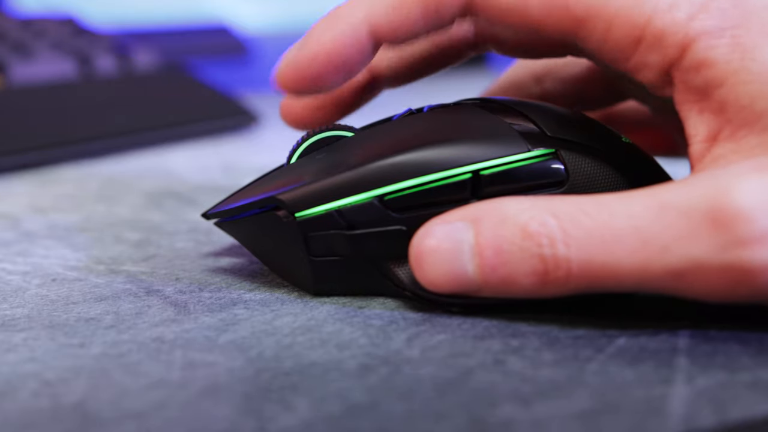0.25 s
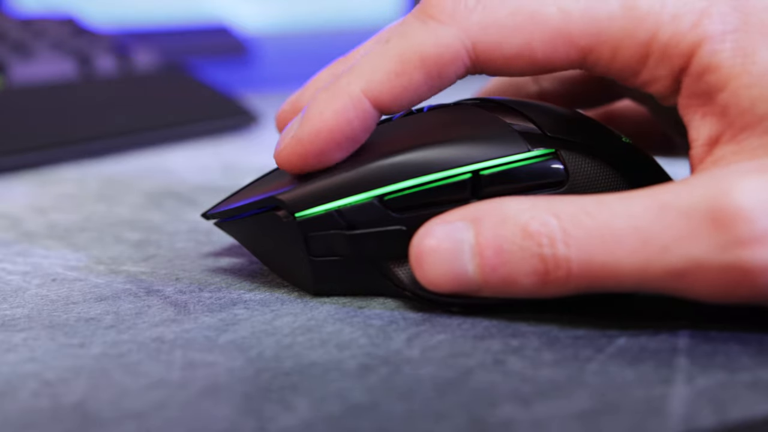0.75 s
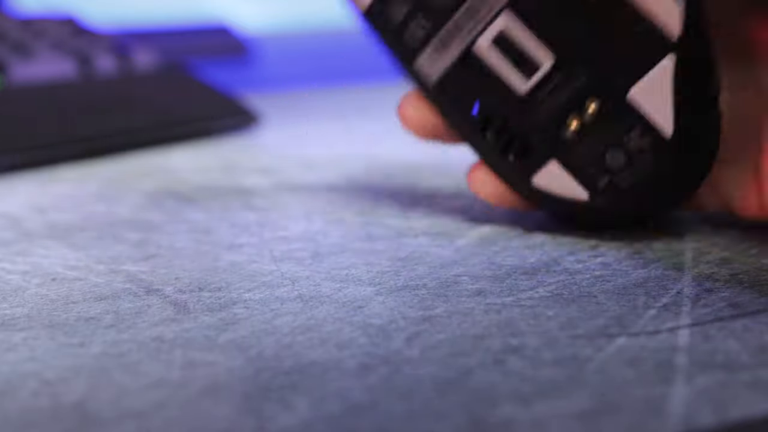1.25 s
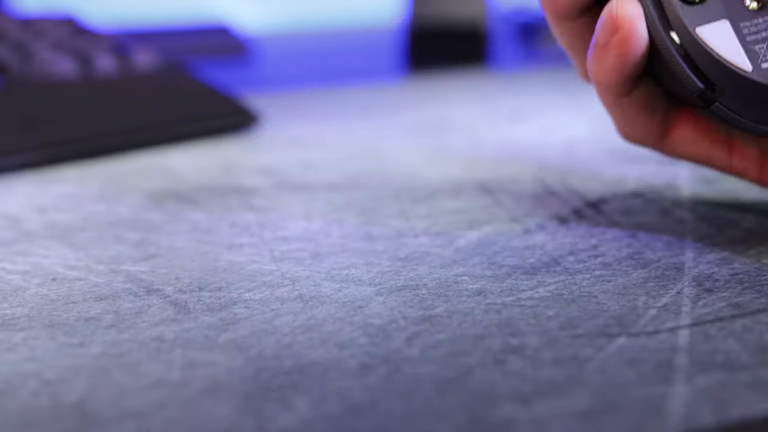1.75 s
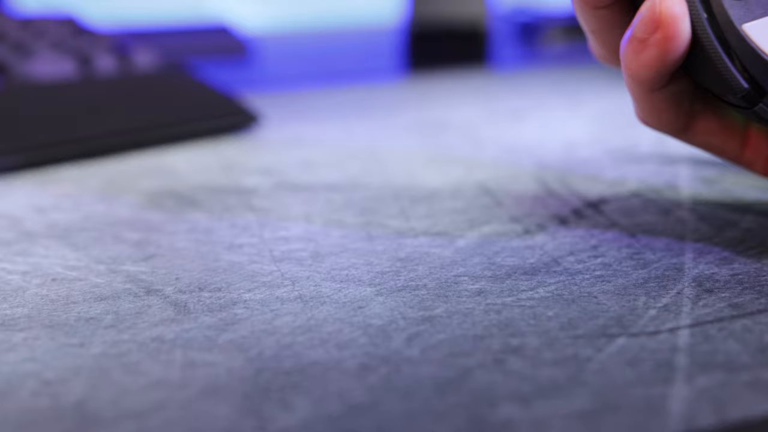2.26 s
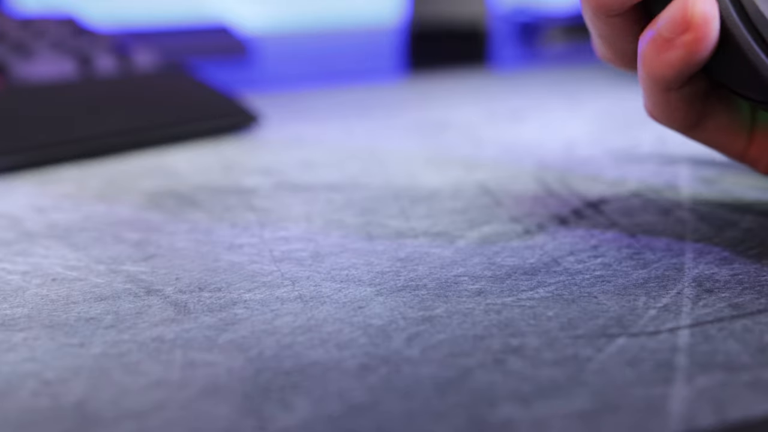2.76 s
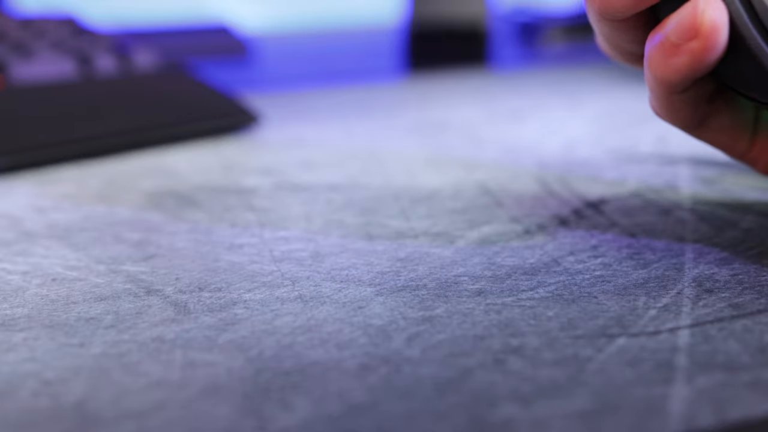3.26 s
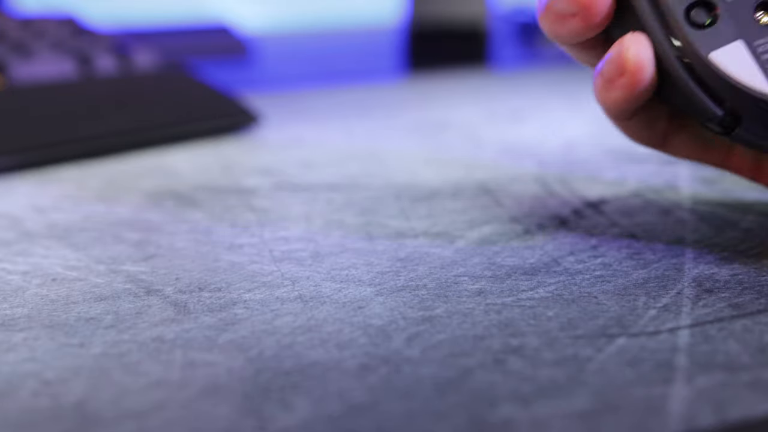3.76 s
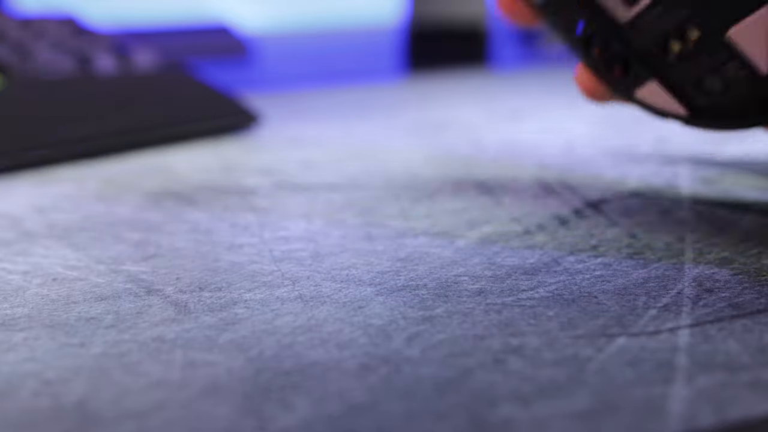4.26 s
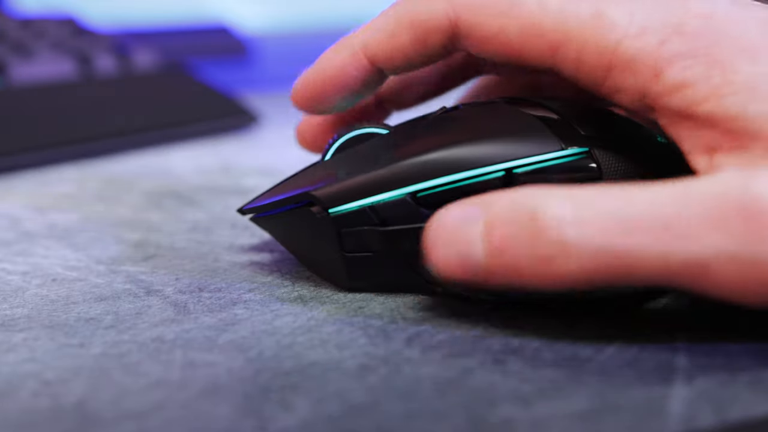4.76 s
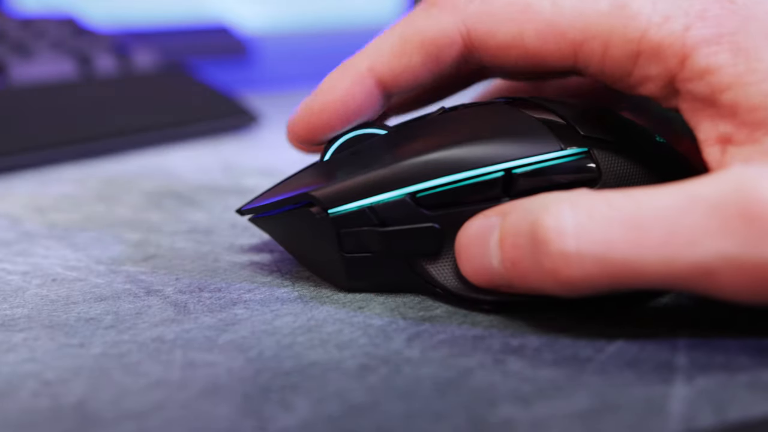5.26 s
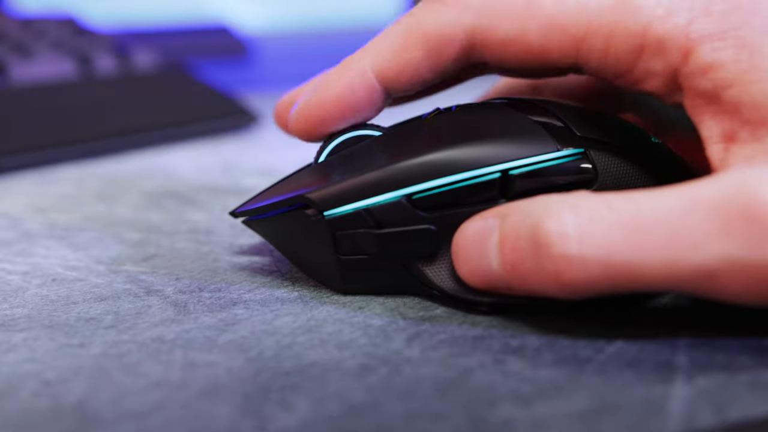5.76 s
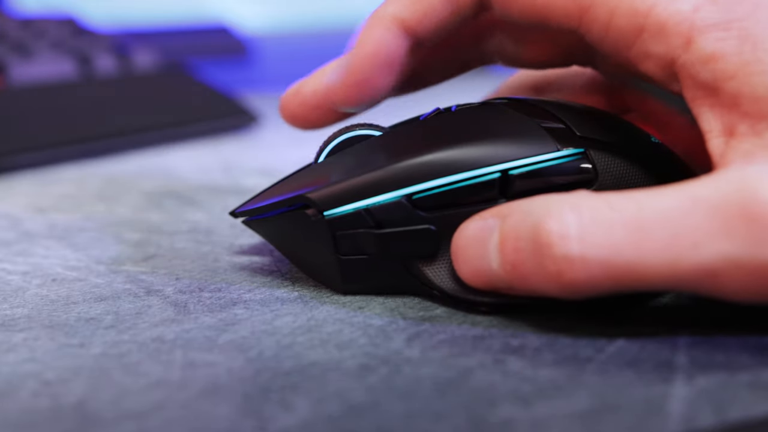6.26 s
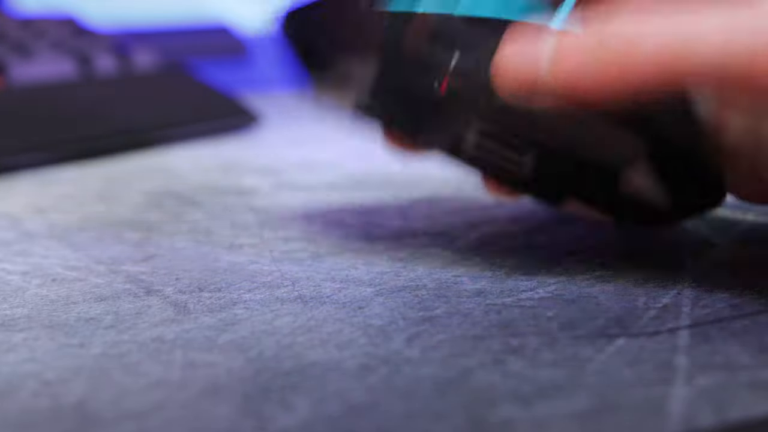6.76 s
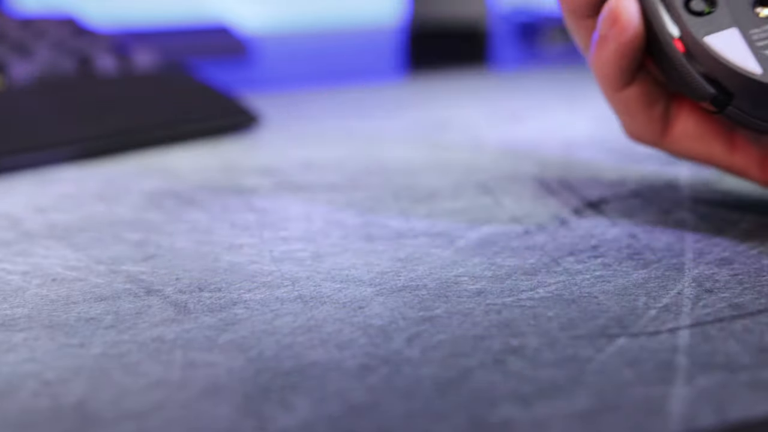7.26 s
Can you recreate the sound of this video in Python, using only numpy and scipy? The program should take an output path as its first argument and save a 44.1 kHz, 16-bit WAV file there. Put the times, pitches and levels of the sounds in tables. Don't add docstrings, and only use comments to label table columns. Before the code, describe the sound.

In a quiet small room with low fan hum, a mouse double-clicks, is lifted, ticked and clicked in hand, then set down with a knock.

```python
import sys
import numpy as np
from scipy import signal
from scipy.fft import rfft, irfft, next_fast_len
from scipy.io import wavfile
from scipy.ndimage import uniform_filter1d

SR = 44100
rng = np.random.default_rng(int(sys.argv[2]) if len(sys.argv) > 2 else 0)


def boost(x):
    u = np.asarray(x, float) / 20
    return 10 ** u


def inscribe(sig):
    pcm = np.round(np.clip(np.atleast_2d(sig).T, -1, 1) * 32767)
    wavfile.write(sys.argv[1], SR, pcm.astype(np.int16))


N = 331191


def evened(x):
    return x / np.sqrt(np.mean(x ** 2) + 1e-20)


def read(points, hz):
    f, value = np.transpose(points)
    return np.interp(np.log(hz + 1), np.log(f + 1), value)


def add(mix, s, sound):
    part = mix[round(s * SR):][:len(sound)]
    part += sound[:len(part)]


def filtered(x, hz, kind="low"):
    return signal.sosfilt(signal.butter(N=2, Wn=hz, btype=kind, fs=SR, output="sos"), x)


def coloured(points):
    size = next_fast_len(N)
    shape = boost(read(points, np.fft.rfftfreq(size, 1 / SR)))
    return evened(irfft(rfft(rng.standard_normal(size)) * shape, size)[:N])


def narrow(hz, width):
    slow = rng.standard_normal(N) + 1j * rng.standard_normal(N)
    r = np.exp(-np.pi * width / SR)
    slow = signal.lfilter([1], [1, -2 * r, r * r], slow)
    carrier = np.exp(2j * np.pi * hz * np.arange(N) / SR)
    return evened((slow * carrier).real)


def patchy(x, depth_db):
    z = signal.stft(x, nperseg=256)[2]
    across_hz = uniform_filter1d(rng.standard_normal(z.shape), 9, 0)
    patches = evened(uniform_filter1d(across_hz, 12, 1))
    return signal.istft(z * boost(depth_db * patches), nperseg=256)[1][:N]


def ring(modes, colour, factor, rise_ms, crack_db, size=4096):
    hz, db, t60_ms = np.transpose(modes)[:, :, None]
    t = np.arange(size) / SR
    scatter_db = 1.0 * rng.standard_normal(hz.shape)
    phase = .04 * rng.standard_normal(hz.shape)
    level = boost(db + read(colour, hz) + scatter_db - 64000.0 * t / t60_ms)
    body = (level * np.sin(2 * np.pi * (hz * factor * t + phase))).sum(0)
    bins = np.fft.rfftfreq(size, 1 / SR)
    shape = boost(read(np.c_[hz, np.minimum(db, -9)], bins) + read(colour, bins)) * (bins > hz[0] / 2)
    crack = irfft(rfft(rng.standard_normal(size)) * shape, size)
    body = body + boost(crack_db - 60 * t / 0.0093) * crack
    return body * (1 - np.exp(-(1e3 * t / rise_ms) ** 2))


def hits(table, modes, tone, rise_ms, crack_db):
    out = np.zeros(N)
    for s, db, contact_db, factor in table:
        colour = [(hz, base_db + slope * contact_db) for hz, base_db, slope in tone]
        colour = sorted(colour + [(3500, 0)])
        add(out, s - rise_ms / 2e3, boost(db) * ring(modes, colour, factor, rise_ms, crack_db))
    return out


# (frequency [Hz], density [dB/Hz])
AIR_SPECTRUM = [(12, -49), (20, -14.5), (53, -9), (71, -9), (117, -4.5), (147, -12), (237, -3), (273, -9),
                (440, -12), (1180, -16.5), (2580, -28), (3830, -36), (4790, -43.5), (15200, -48.5),
                (16500, -67)]
# (frequency [Hz], width [Hz], level [dB])
BACKGROUND_TONES = [(84.5, 6.4, -57), (120, 7.8, -61.5), (233.5, 26, -63), (1176, 92, -66), (3755, 930, -74)]


def room_tone():
    hum = boost(-53.5) * np.sin(2 * np.pi * 120.5 * np.arange(N) / SR)
    fan = sum(boost(db) * narrow(hz, width) for hz, width, db in BACKGROUND_TONES)
    return boost(-51) * coloured(AIR_SPECTRUM) + fan + hum


# (frequency [Hz], T60 [s], level [dB])
ROOM_DECAY = [(200, 0.12, 8.5), (1090, 0.37, -9.5), (2500, 0.34, -5.5), (3800, 0.35, -2.5),
              (5500, 0.3, -3.5), (9000, 0.35, -10.5), (15000, 0.19, -12.5)]


def room(x, scatter_hz):
    size = SR // 2
    hz = signal.stft(np.zeros(size), SR, nperseg=256)[0]
    t60, level_db = (read(np.array(ROOM_DECAY)[:, [0, k]], hz)[:, None] for k in (1, 2))
    turn = np.cumsum(rng.standard_normal(N)) * np.sqrt(2 * np.pi * scatter_hz / SR)
    out = np.zeros(N)
    at = np.arange(300, size - 10, 10)
    for share in (np.cos(turn), np.sin(turn)):
        taps = np.zeros(size)
        taps[at + rng.integers(0, 10, at.shape)] = rng.choice([-1., 1.], at.shape)
        _, t, z = signal.stft(taps, SR, nperseg=256)
        z = z * boost(level_db - 60 * t / t60) / np.sqrt(t60)
        tail = signal.istft(z, SR, nperseg=256)[1]
        out += signal.fftconvolve(x * share, tail / np.linalg.norm(tail))[:N]
    return out


# (start [s], length [s], hiss [dB], speed as brightness [dB])
SKIN_STROKES = [(0.955, 0.17, -74.5, -5), (1.09, 0.16, -69.5, -7), (1.2, 0.24, -64, 3),
                (1.38, 0.17, -57.5, 6), (1.535, 0.084, -56.5, 5.5), (1.81, 0.082, -70, 1.5),
                (2.13, 0.16, -69, 0), (2.25, 0.22, -71.5, -8), (2.479, 0.058, -60.5, -3),
                (2.603, 0.099, -62.5, 2), (2.95, .1, -70, -4), (3.185, 0.041, -66, 5),
                (3.304, 0.029, -65, -2), (3.46, .14, -71, -8), (3.925, 0.04, -63, -9),
                (3.951, 0.096, -56.5, 8.5), (4.036, 0.081, -61.5, 8), (4.105, .077, -58.5, 7),
                (6.572, 0.28, -71, -9), (6.773, 0.25, -62, 1), (6.975, .075, -59, 4), (7.02, 0.11, -55, 9),
                (7.15, 0.13, -61.5, 5), (7.272, 0.059, -67, 8), (7.322, 0.051, -59, 4),
                (7.37, 0.056, -67.5, 0.5), (7.42, .13, -65, 3)]
# (start
# [s], length [s], hiss [dB], speed as brightness [dB])
FOOT_STROKES = [(.39, .06, -75, -1), (0.452, 0.054, -68.5, 4), (1.19, 0.14, -67.5, -6.5),
                (4.17, 0.072, -78, 2), (4.34, 0.027, -72.5, -10), (4.448, .066, -60, -7),
                (4.51, 0.064, -65.5, -8), (4.617, .1, -61.5, 7), (4.655, 0.083, -59.5, -12),
                (4.776, .091, -70, 3), (5.24, 0.12, -79.5, -9), (5.798, .12, -76, -1.5)]
# (frequency [Hz], density [dB/Hz])
HISS_SPECTRUM = [(1200, -10), (2000, 10), (4500, 1), (7300, 5.5), (9000, 1), (12500, -1), (15500, -6)]
# (frequency [Hz], width [Hz])
RUBBED_RESONANCES = [(1170, 710), (3750, 1160)]
# (level re hiss [dB], slope with brightness [dB/dB])
SKIN_WAKE = [(1, -0.98), (1.5, -0.42)]
FOOT_WAKE = [(7.8, -0.73), (2.5, -.6)]


def rubbing():
    out = np.zeros(N)
    grain = boost(.7 * evened(uniform_filter1d(rng.standard_normal(N), 120)))
    hiss = coloured(HISS_SPECTRUM)
    bright = filtered(hiss, 9500, "high")
    bands = [narrow(*band) for band in RUBBED_RESONANCES]
    for strokes, wake in ((SKIN_STROKES, SKIN_WAKE), (FOOT_STROKES, FOOT_WAKE)):
        for start, length, hiss_db, bright_db in strokes:
            span = slice(round(start * SR), min(round((start + length) * SR), N))
            sound = hiss[span] + (boost(bright_db) - 1) * bright[span]
            for (db, slope), band in zip(wake, bands):
                sound = sound + boost(db + slope * bright_db) * band[span]
            t = np.arange(len(sound)) / SR
            press = np.sin(np.pi * np.clip((t + 0.0016) / (length + 0.0044), 0, 1)) ** 1.06
            out[span] += boost(hiss_db) * press * sound
    return patchy(out * grain, 1.8)


# (time [s], blow [dB], contact force [dB], push into the desk [dB])
LANDINGS = [(4.4542, -30, 2, -16.5), (4.459, -13, -3, -39), (4.4622, -22.5, 9.5, -45),
            (4.4629, -21, 0, -49), (4.468, -29, -5, -39), (4.476, -37, -7, -43), (4.4915, -35, -7, -28.5),
            (4.527, -50, 0, -36), (4.6727, -32, -4, -21.5), (4.6765, -21.5, 3.5, -38),
            (4.684, -32, 10, -51), (4.690, -32, -6, -27.5), (4.815, -54, 1.5, -38.5)]
# (frequency [Hz], level [dB], T60 [ms])
DESK_MODES = [(88, -14, 210), (111.5, -5, 200), (144.4, -1.5, 110), (172, -2.5, 90), (209, -5, 90),
              (347, 1.5, 50.5), (543, -14, 86)]


def desk():
    out = np.zeros(N)
    for s, *_, push_db in LANDINGS:
        thud = ring(DESK_MODES, [(1, 0), (2, 0)], 0.918, 2.1, -18.5, size=12000)
        add(out, s + 0.00086, boost(push_db) * thud)
    return out


# (frequency [Hz], level [dB], T60 [ms])
BASE_MODES = [(680, -11.5, 30), (971, -1, 55), (1085, -5.5, 51), (1286, -8, 49), (1460, -10, 9),
              (1820, -2, 21), (2180, 1, 18.3), (2990, -9.5, 11), (3107, -1, 29.4), (3500, -2, 19.4),
              (3770, -10, 33), (4210, -9.5, 22), (5200, -9, 20), (6540, -8, 12), (7730, -15, 43),
              (10800, -11.5, 17), (12900, -14.5, 6), (13100, -7, 6), (15200, -11, 6)]
# (frequency [Hz], level [dB], slope with force [dB/dB])
FOOT_TONE = [(1000, 0, 0.098), (6000, -2.2, .4), (12000, -5, 0.82)]


def landings():
    feet = [(*row[:3], 1) for row in LANDINGS]
    return hits(feet, BASE_MODES, FOOT_TONE, 0.53, 14.5)


# (frequency [Hz], level [dB], T60 [ms])
SHELL_MODES = [(972, -7.5, 67), (1014, -10, 37), (2055, -8, 24), (2640, 2, 11), (3400, -6, 24),
               (3810, -8.5, 30), (4500, -4, 17), (6180, -13, 7.2), (7860, -11, 7.4), (10600, -19, 6.5),
               (13800, -21, 6)]
# (time [s], blow [dB], contact force [dB], pitch factor [1])
CREAKS = [(1.571, -41, 1.5, 0.95), (2.4535, -49, 2.5, 1.001), (2.475, -48, 0, 0.77),
          (2.499, -39.5, -14, 0.84), (2.631, -47, -6, 1.001), (3.950, -36, -6, 1.1),
          (4.3465, -44.5, 0, 0.92), (4.812, -40, -22, 1.001), (6.72, -50, 3, 1.2), (6.838, -46.5, 5, 1.001),
          (7.255, -50, 7, 0.9)]
# (frequency [Hz], level [dB], slope with force [dB/dB])
CREAK_TONE = [(1000, -15.5, -.1), (6000, -9, 1.1), (12000, -4, .6)]


def creaks():
    return hits(CREAKS, SHELL_MODES, CREAK_TONE, 0.38, 13.0)


# (time [s], blow [dB], contact force [dB], pitch factor [1])
KNOCKS = [
    (2.8525, -33, 3, 1.02),
    (3.335, -36.5, 0, 1),
    (3.4243, -39.5, -10, 1),
    (3.6223, -30.5, 2, 0.99),
    (7.313, -37, -17, 0.9),
    (7.451, -39, -3, 1.15),
    (7.455, -35, 5, 1.05),
]
# (frequency [Hz], level [dB], slope with force [dB/dB])
KNOCK_TONE = [(1000, 1.2, 0.21), (5850, .1, 1.9), (12000, 1.2, .3)]


def knocks():
    return hits(KNOCKS, SHELL_MODES, KNOCK_TONE, 0.53, 9.6)


# (frequency [Hz], level [dB], T60 [ms])
PLATE_MODES = [(1084, -14, 38), (1140, 0, 26.5), (1720, -16, 20), (2344, -7.5, 37), (3630, -6, 14),
               (4430, -14.5, 10), (6000, -24, 8), (12000, -38, 5)]
# (time [s], blow [dB], contact force [dB], pitch factor [1])
TAPS = [
    (3.986, -34, -4.5, 0.99),
    (4.154, -23.5, -2, 0.97),
    (4.319, -48.5, 7, 1.02),
    (7.009, -38, 3, 0.95),
    (7.0215, -28.5, 2, 1.035),
    (7.025, -37, 3, 0.97),
    (7.035, -50, -2, 1.1),
]
# (frequency [Hz], level [dB], slope with force [dB/dB])
TAP_TONE = [(1000, 0.3, 1.3), (2400, -4.5, -1.5), (6000, 2, .4), (12000, -.8, .4)]


def taps_on_base():
    return hits(TAPS, PLATE_MODES, TAP_TONE, 0.83, 3)


# (frequency [Hz], level [dB], T60 [ms])
WIRE_MODES = [(7260, 1.5, 47), (7280, -13, 60)]
# (time [s], blow [dB], contact force [dB], pitch factor [1])
WIRE_PINGS = [
    (1.589, -43, 0, 1.01),
    (3.745, -54, 0, 0.94),
]


def wire():
    return hits(WIRE_PINGS, WIRE_MODES, [(1000, 0, 0)], 0.38, -30)


# (frequency [Hz], level [dB], T60 [ms])
BUTTON_MODES = [(1020, -19, 48), (3330, -12.5, 8.3), (4410, -13, 5), (6770, -14, 7), (7370, -15, 13),
                (9110, -9.5, 3.9), (12080, -16, 16), (13000, 3, 5), (14500, 3, 6), (15250, -3, 8)]
# (time [s], blow [dB], contact force [dB], pitch factor [1])
TICKS = [
    (1.5886, -25, -6, 1.02),
    (1.7106, -24.5, 4.5, 0.99),
    (3.745, -22.5, -6, 1.01),
    (3.9965, -21.5, 0, 1.05),
]
# (frequency [Hz], level [dB], slope with force [dB/dB])
TICK_TONE = [(1000, -5, -0.53), (6000, 0, 0.74), (12000, 6, .01), (13200, -2, -1.1), (14500, .8, 0.12)]


def ticks():
    return hits(TICKS, BUTTON_MODES, TICK_TONE, 0.42, 8.2)


# (frequency [Hz], level [dB], T60 [ms])
SPRING_MODES = [(1290, -19.5, 19), (1890, -12.5, 11.8), (2640, -11, 7.3), (3384, 1, 17), (3510, -8, 13.7),
                (4300, -4.5, 3.8), (5610, -15, 10.3), (6040, -10, 3.8), (6740, -7, 4.7), (8020, -20.5, 6.4),
                (10740, -15, 10), (13800, -20, 5)]
# (time [s], blow [dB], contact force [dB], pitch factor [1])
CLICKS = [
    (.5337, -23.5, 16, 1.025),
    (0.5632, -19.5, 5, 1.027),
    (.6879, -22, 16, 1.05),
    (0.7402, -19.5, 3, 1.024),
    (2.772, -19.5, 8.5, 1.03),
    (3.178, -18.5, -1, 1.003),
    (3.3552, -20.5, 10.5, 1.012),
    (3.6623, -19.5, -1, 1.018),
    (7.5003, -23.5, 10, 1.08),
]
# (frequency [Hz], level [dB], slope with force [dB/dB])
CLICK_TONE = [(1000, -5.5, 0.52), (6000, 5, 0.13), (12000, -2, 0.99)]


def clicks(part):
    return hits(part, SPRING_MODES, CLICK_TONE, 0.78, 4.9)


def scene():
    on_desk, lifted = clicks(CLICKS[:4]), clicks(CLICKS[4:])
    mouse = on_desk + lifted + ticks() + wire() + taps_on_base() + knocks() + creaks() + landings()
    add(mouse, .0036, boost(-10.0) * filtered(mouse, 4300))
    skin = rubbing()
    walls = room(boost(-17.5) * (mouse - on_desk) + boost(-11.5) * skin, scatter_hz=300)
    walls = walls + room(boost(-18.0) * on_desk, scatter_hz=140)
    return (mouse + skin + walls + desk() + room_tone())[None]


def top_cut(x):
    return signal.sosfilt(signal.butter(12, 17160, fs=SR, output="sos"), x)


def record(dry):
    dry = filtered(dry, 32, "high")
    low_pass = signal.firwin(301, 15900, window=("kaiser", 5), fs=SR)[None]
    limited = signal.oaconvolve(dry, low_pass, "same")
    top = signal.oaconvolve(dry, signal.firwin(301, 16900, fs=SR)[None], "same") - limited
    sharp = np.clip(uniform_filter1d(abs(top), 90) / boost(-56), 0, 1) ** 2
    return top_cut(limited + boost(-15) * sharp * top)


dry = scene()
out = record(dry)
inscribe(out)
```